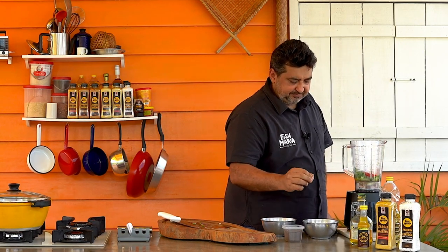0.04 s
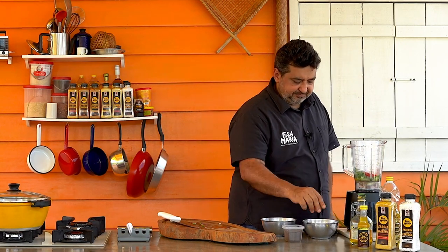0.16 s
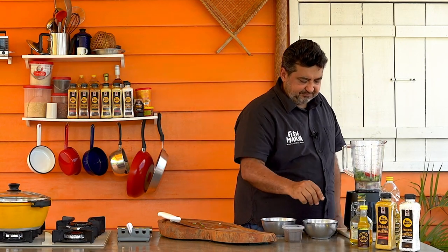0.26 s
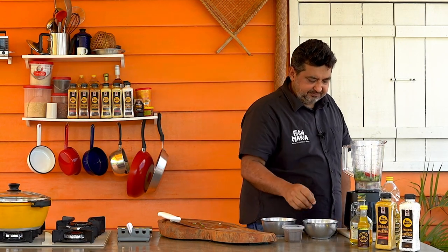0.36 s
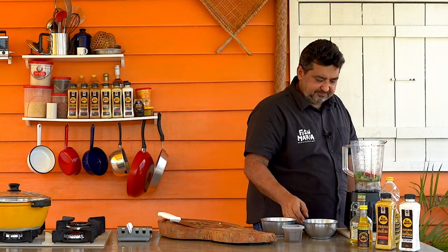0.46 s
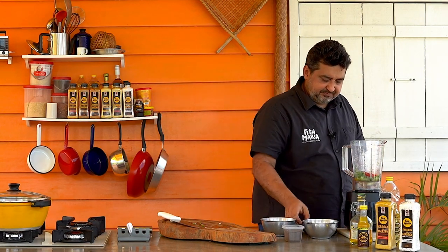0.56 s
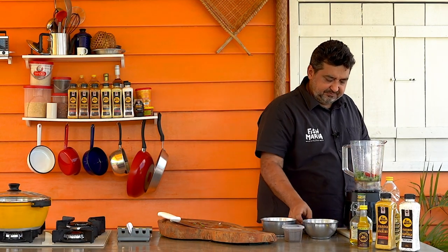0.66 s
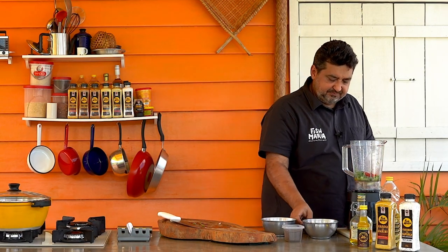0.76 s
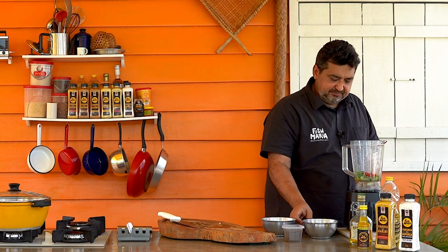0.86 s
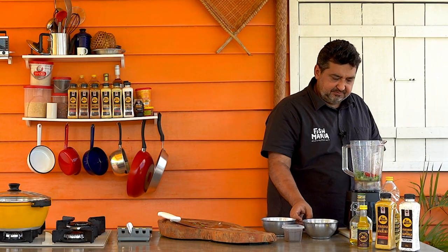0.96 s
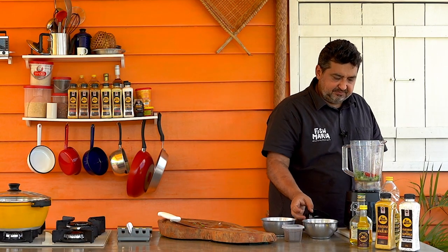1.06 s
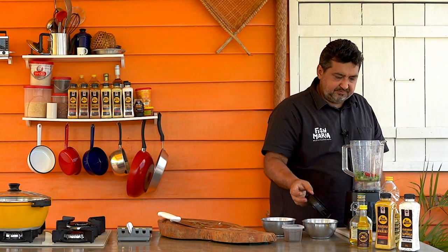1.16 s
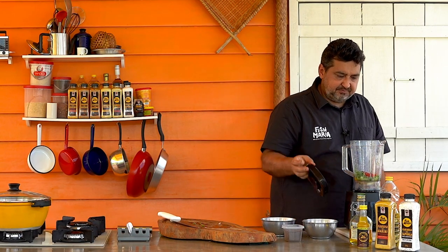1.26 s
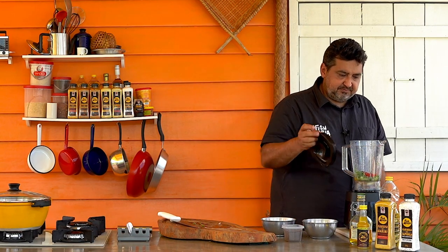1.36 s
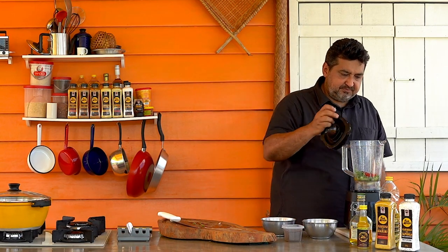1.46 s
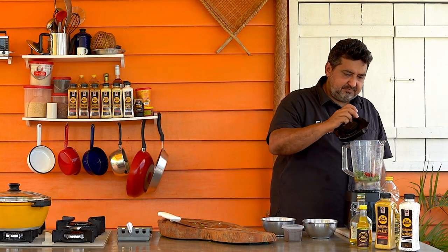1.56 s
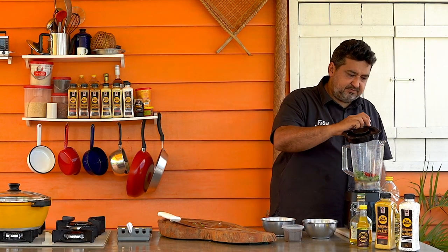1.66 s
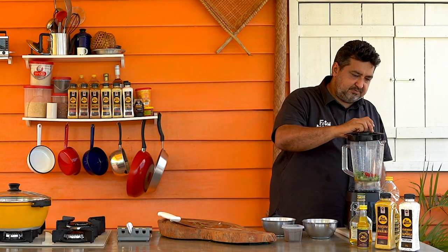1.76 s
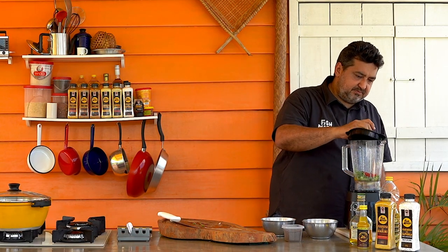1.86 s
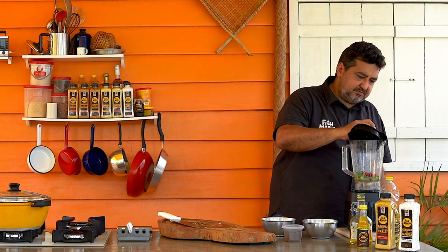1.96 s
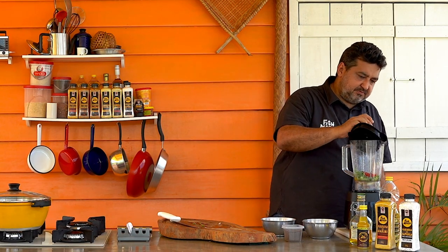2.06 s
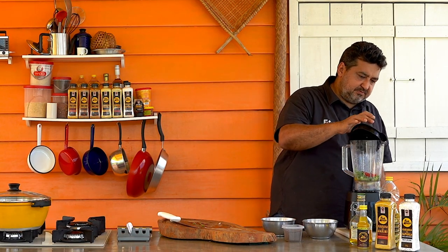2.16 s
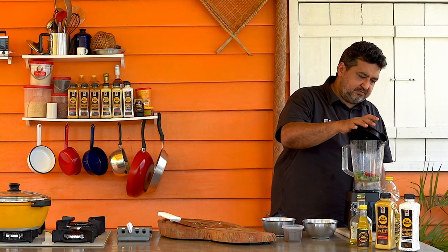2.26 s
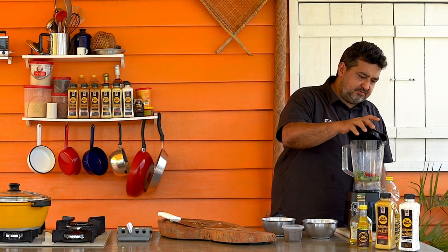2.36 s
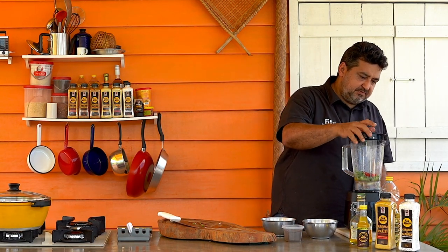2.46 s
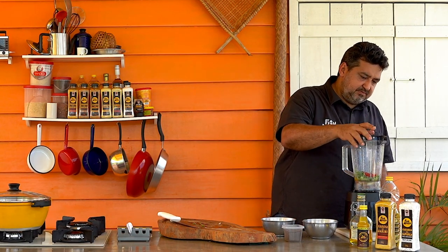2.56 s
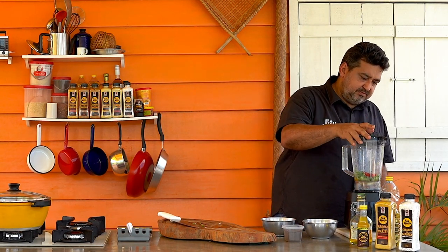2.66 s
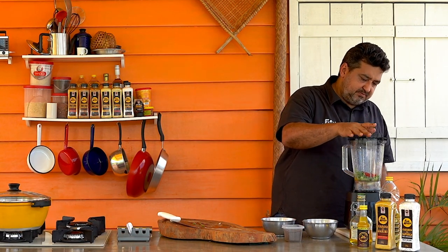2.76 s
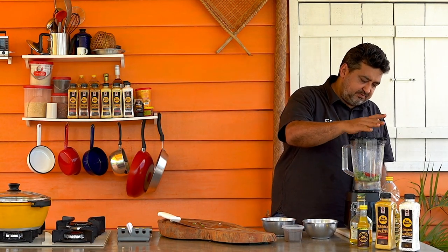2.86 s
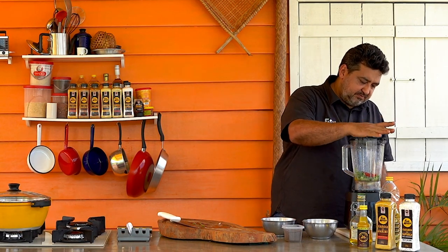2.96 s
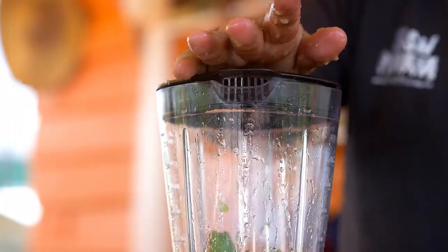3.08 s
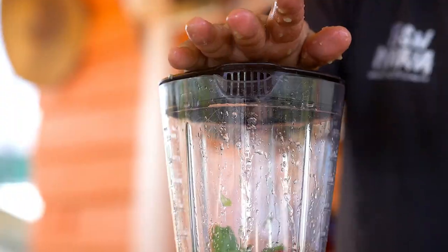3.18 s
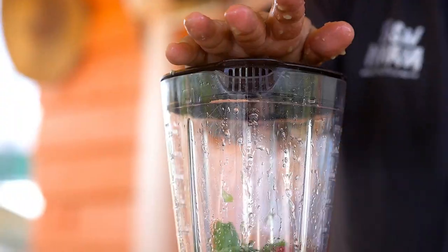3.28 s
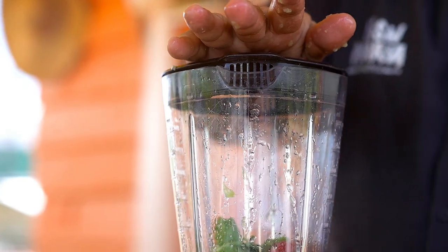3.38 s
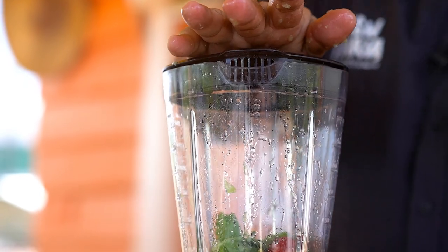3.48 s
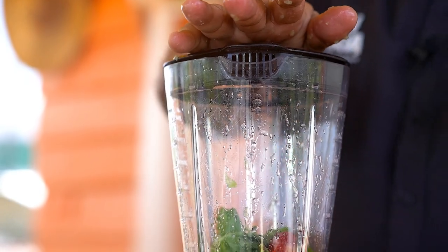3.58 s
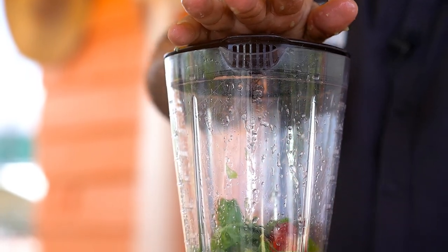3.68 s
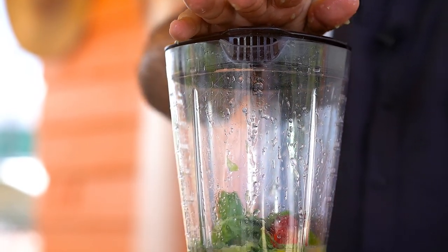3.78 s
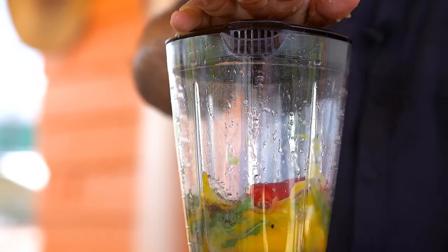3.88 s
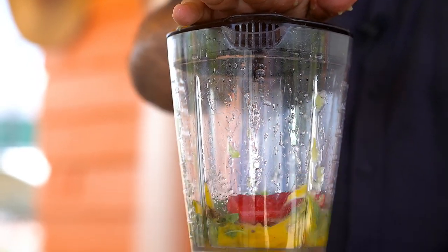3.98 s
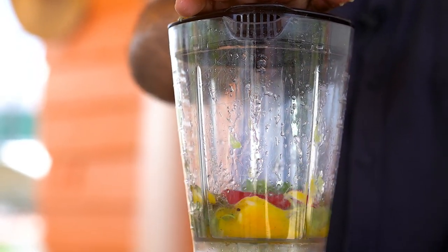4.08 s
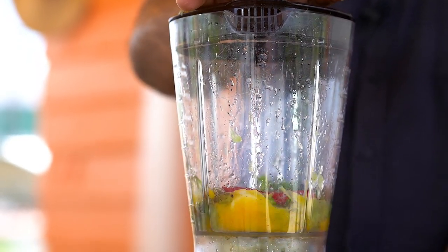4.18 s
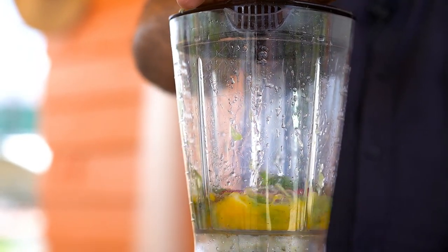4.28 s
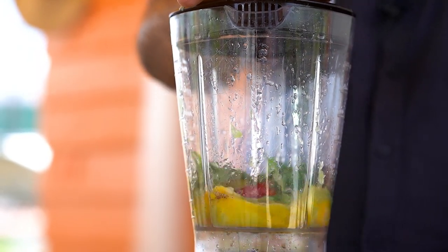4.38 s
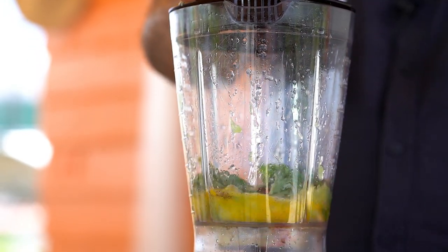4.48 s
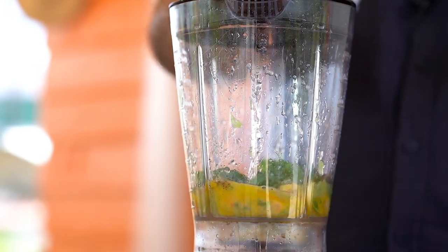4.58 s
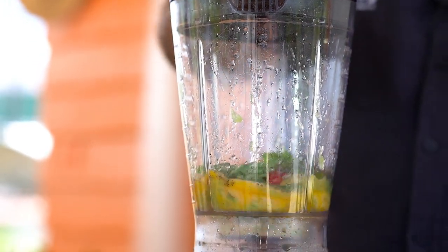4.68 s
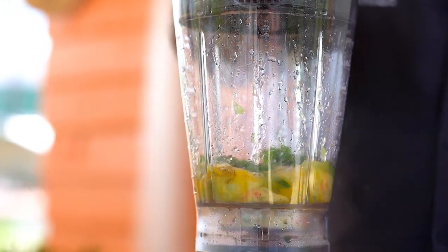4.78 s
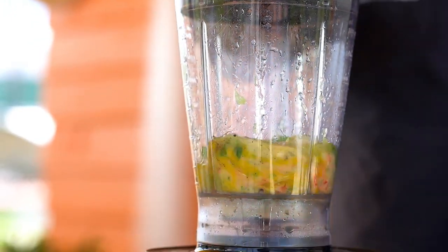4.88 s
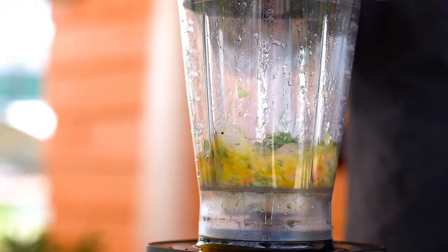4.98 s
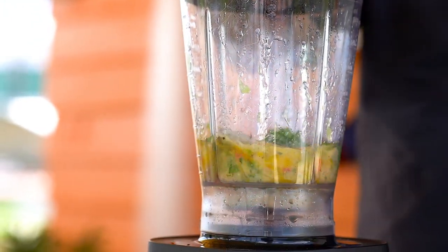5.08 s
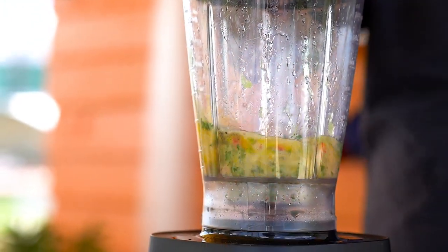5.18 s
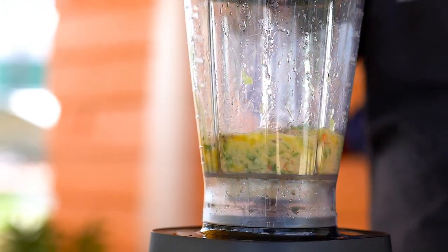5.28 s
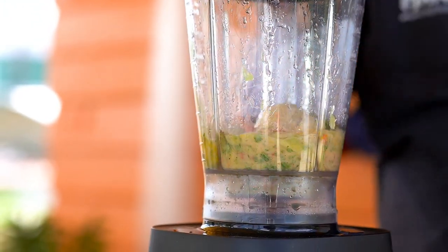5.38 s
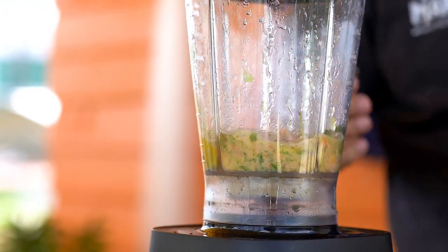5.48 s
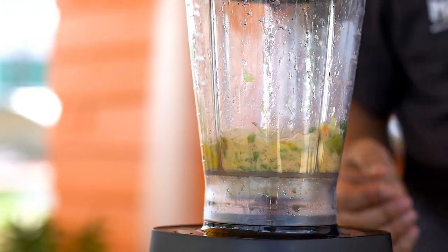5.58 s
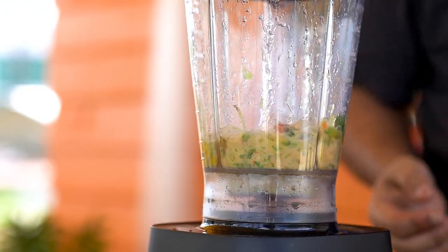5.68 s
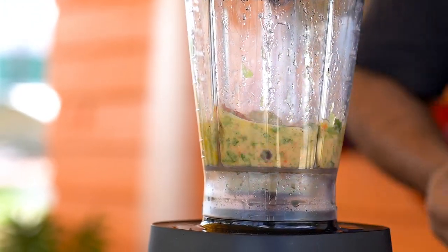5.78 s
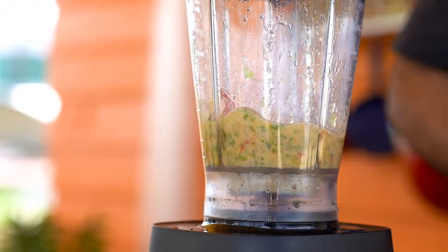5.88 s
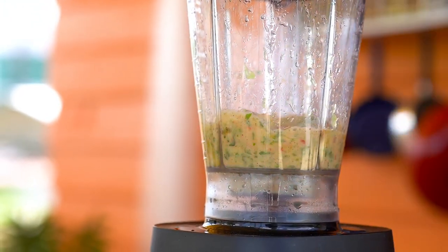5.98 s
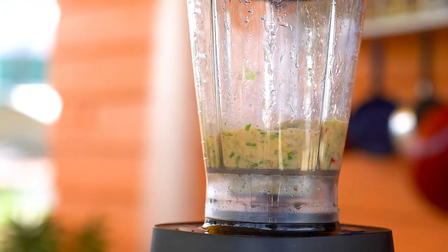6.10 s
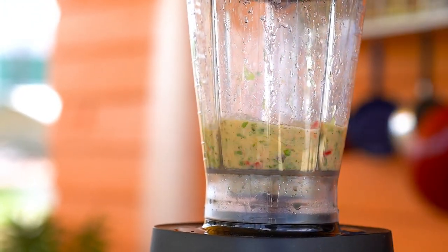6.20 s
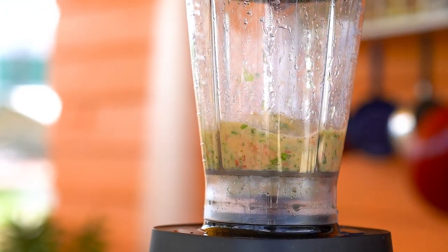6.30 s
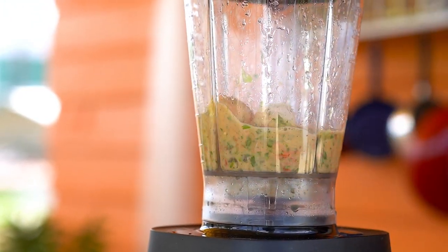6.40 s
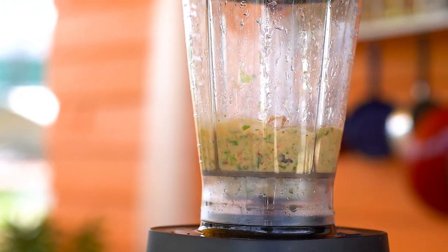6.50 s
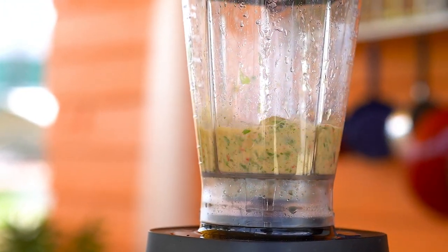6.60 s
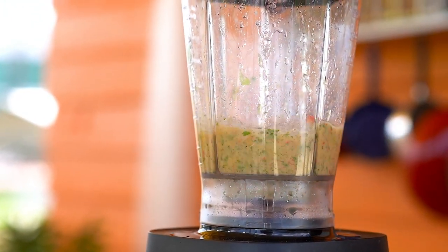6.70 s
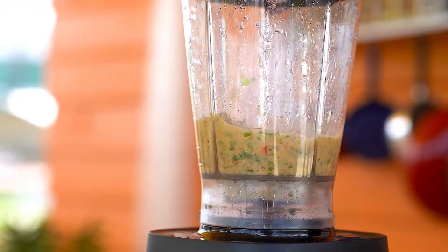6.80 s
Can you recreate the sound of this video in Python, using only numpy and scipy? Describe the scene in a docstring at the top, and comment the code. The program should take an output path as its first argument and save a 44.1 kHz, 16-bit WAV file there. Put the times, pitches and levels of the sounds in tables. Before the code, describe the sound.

In an open-air kitchen, a blender lid is picked up and knocked into place, then the blender kicks on loudly and chops wet food.

```python
"""Outdoor air, a far machine's hum and whine and a faint ticking rustle lie under an open-air kitchen.
A plastic lid is picked up among steel bowls, knocked onto a blender jar and pressed home: struck modes,
noise bursts and rubbing, answered by nearby walls, with narrow swishes and a thin passing drone.
Then the motor kicks the jar and spins up: multiples of the shaft speed whine, a wandering sine howls
at the jar's strongest resonance, and shaped noise makes the chopped food, flung pieces and fan."""
import sys
import numpy as np
from scipy import signal
from scipy.fft import rfft, irfft, next_fast_len
from scipy.io import wavfile
from scipy.ndimage import uniform_filter1d, map_coordinates

SR = 44100
rng = np.random.default_rng(int(sys.argv[2]) if len(sys.argv) > 2 else 0)


def bounce(signal):
    """Save signal as a 16-bit WAV file at the path given by the first command-line argument."""
    frames = np.transpose(np.atleast_2d(signal))
    limited = np.clip(frames, -1, 1)
    pcm = np.round(limited * 32767).astype(np.int16)
    wavfile.write(sys.argv[1], SR, pcm)


N = 301864  # length of the scene in samples
T = np.arange(SR // 3) / SR  # time within one struck sound, s


def amp(db):
    """Gain of a level in dB."""
    return 10 ** (np.asarray(db) / 20)


def unit(x):
    """x at rms 1."""
    return x / np.sqrt(np.mean(x ** 2) + 1e-20)


def along(points, hz):
    """Values between (Hz, value) points on a log frequency axis."""
    f, values = np.transpose(points)
    return np.interp(np.log(hz + 1), np.log(f + 1), values)


def curves(rows):
    """One value per sample for each column, then a gate that is open inside the table's span."""
    s, *cols = np.transpose(rows)
    t = np.arange(N) / SR
    gate = np.clip(np.minimum(t - s[0], s[-1] + 0.0096 - t) / 0.0037, 0, 1)
    return [np.interp(t, s, c) for c in cols] + [gate]


def spell(start, length, edge=0.024):
    """A gain that fades in, holds and fades out; start, length and edge in seconds."""
    t = np.arange(N) / SR - start
    return np.clip(np.minimum(t, length - t) / edge, 0, 1) ** 2


def wobble(rate):
    """A smooth random curve, rate knots a second."""
    knots = rng.standard_normal(int(N * rate / SR) + 4)
    return map_coordinates(knots, [np.arange(N) * rate / SR])


def filtered(x, response):
    """x shaped by a complex response of frequency."""
    m = next_fast_len(N + SR // 2)
    return irfft(rfft(x, m) * response(np.fft.rfftfreq(m, 1 / SR)), m)[:N]


def coloured(x, points):
    """x shaped by a spectrum of (Hz, dB) points."""
    return filtered(x, lambda f: amp(along(points, f)))


def mode(f, hz, width_hz):
    """Response of one resonance, 1 at its top."""
    return 1j * f * width_hz / (hz * hz - f * f + 1j * f * width_hz + 1e-9)


def patchy(patchy_db, size=(512, 6, 8)):
    """White noise with patches of random gain; size = frame, bins and frames of a patch."""
    z = signal.stft(rng.standard_normal(N + size[0]), nperseg=size[0])[2]
    field = uniform_filter1d(rng.standard_normal(z.shape), size[1], 0)
    field = uniform_filter1d(field, size[2], 1)
    return signal.istft(z * amp(patchy_db * unit(field)), nperseg=size[0])[1][:N]


def tone(hz, jitter_hz, rate):
    """A sine of rms 1 whose pitch wanders."""
    return np.sqrt(2) * np.sin(2 * np.pi * np.cumsum(hz + jitter_hz * wobble(rate)) / SR)


def ring(modes, push=0.00066, hardness_db=0, scatter=0.016, spread_db=5.0):
    """The modes of a struck thing; strengths and pitches shift with the spot that is hit."""
    hz, db, t60 = np.transpose(modes)[:, :, None]
    db = db + rng.normal(0, spread_db, hz.shape)
    db = db + hardness_db * np.log2(hz / 1500)  # a hard contact favours the high modes
    hz = hz * (1 + rng.normal(0, scatter, hz.shape))
    decay = amp(db - 60 * T / t60)
    onset = 1 - np.exp(-T / max(push, .0002))
    return (decay * np.sin(2 * np.pi * hz * T)).sum(0) * onset


def crack(t60, push=0.00028):
    """A decaying burst of noise at the contact; push is its rise time in seconds."""
    return rng.standard_normal(len(T)) * amp(-60 * T / t60) * (1 - np.exp(-T / max(push, .0001)))


def add(track, s, sound):
    """Lay a sound on the track at time s."""
    track[round(s * SR):][:len(sound)] += sound


def outdoor_air():
    """Open-air noise: broad, slightly patchy and drifting in level."""
    # Spectrum of the air. Each row: frequency in Hz, relative density in dB.
    air_colour = [(20, -12), (60, -9), (150, -6), (300, -6), (480, -9), (700, -12), (1500, -20.5),
                  (2300, -25), (5000, -34.5), (10000, -45.5), (15500, -60)]
    # Drift of the air. Each row: time in seconds, level in dB before a slight wobble.
    air_level = [(0.0, -40.5), (1.78, -41.5), (1.94, -35), (2.21, -39.5), (2.62, -44), (2.75, -42.5),
                 (3.8, -41)]
    air_db, _ = curves(air_level)
    return amp(air_db + 0.092 * wobble(9.7)) * unit(coloured(patchy(1), air_colour))


def far_machine():
    """A far machine: noise through narrow resonances hums low and whines high."""
    # Bands of the machine. Each row: centre in Hz, width of the resonance in Hz, level in dB.
    far_bands = [(124.5, 32, -42), (477, 8.7, -52.5), (1571, 28, -51), (1689, 120, -54.5)]
    total = np.zeros(N)
    for hz, width_hz, db in far_bands:
        band = filtered(rng.standard_normal(N), lambda f: mode(f, hz, width_hz) ** 2)
        total += amp(db) * unit(band)
    return total


def rustle():
    """A faint treble rustle near the microphone comes and goes, with tiny ticks in it."""
    # Spectrum of the rustle. Each row: frequency in Hz, relative density in dB.
    rustle_colour = [(5000, -30), (8000, -8), (12000, 6), (14000, -5), (15700, -14)]
    level_db, ticks_per_s, tick_db = -69, 12, 22  # tick gain before colouring
    ticks = (rng.random(N) < ticks_per_s / SR) * rng.standard_normal(N) * amp(tick_db)
    ticks = signal.fftconvolve(ticks, crack(.003)[:400])[:N]
    hiss = coloured(patchy(2.2), rustle_colour)
    swelling_hiss = amp(1.33 * wobble(5)) * hiss
    return amp(level_db) * (swelling_hiss + coloured(ticks, rustle_colour)) / np.std(hiss)


def jar_knocks(rings, clatter, cracks):
    """Knocks on the jar: its air sounds one low note, its wall rings and the contact bursts into noise."""
    # Three tables of blows: lid against the jar's rim, hand on the closed lid, starting motor's kicks.
    # Each row: start in seconds, strength in dB, air note in Hz, clatter in dB over the strength,
    # crack in dB over the strength, rise of the push in seconds.
    rim_knocks, lid_pats, motor_jolts = [(0.202, -22.5, 300, -12, -20, .004),
                                         (1.732, -24, 223, 5.5, -12, 0.0048),
                                         (1.783, -9.5, 452, -16, -31, 0.0076),
                                         (1.849, -7.5, 470, -6, -40, 0.00027),
                                         (1.872, -1.5, 491, -16.5, -38, 0.0048),
                                         (1.899, -10, 485, -30, -34, 0.0045),
                                         (1.957, -2.5, 432, -7, -21, 0.0014),
                                         (1.979, -13.5, 470, -1, -21, 0.0046),
                                         (2.056, -5, 456, -12, -22, 0.00076),
                                         (2.072, -4, 457, -13.5, -35, 0.0061),
                                         (2.258, -16, 455, -15, -32, 0.0024),
                                         (2.455, -14, 417, -20, -30, .012),
                                         (2.474, -4, 425, -13, -21, 0.015),
                                         (2.509, -13.5, 382, -15, -10, 0.0047),
                                         (2.537, -19, 395, -1, -15, 0.003),
                                         (2.549, 1.5, 355, -15, -19, .0015),
                                         (2.573, -9.5, 462, -4, -16, 0.0025),
                                         (2.588, -24, 417, -7, 4, .006),
                                         (2.618, -4, 300, -6.5, -30, 0.0024),
                                         (2.753, -20, 270, -19, -24, .0027)], [(2.97, -20, 132, -24, -28, 0.0071),
                                                         (3.044, -16, 200, -10, -18, 0.0059),
                                                         (3.052, -7, 207, -4.5, -13.5, 0.00053),
                                                         (3.274, -23, 335, -9, -32, 0.0027),
                                                         (3.585, -34.5, 124, 3.5, -6, .006)], [(3.881, -10, 253, -3.5, -10, 0.002),
                                                                       (3.901, -8, 525, -5, -21, 0.0015),
                                                                       (3.956, -2, 262, -15, -30, 0.022)]
    # Modes of the jar wall. Each row: frequency in Hz, relative level in dB, decay by 60 dB in seconds.
    wall_modes = [(750, -2, 0.038), (990, -10, 0.022), (1245, 1.5, 0.033), (1464, 0, 0.032),
                  (1710, 1.5, 0.04), (2400, -0.5, 0.018), (2500, -13, 0.027)]
    # Each row: blows, counter thud in dB, wall ring in dB, decay of the jar's air in seconds.
    for rows, thud_db, wall_db, t60 in [
            (rim_knocks, -18, -9, .062), (lid_pats, -5, -10, .06), (motor_jolts, -18, -6, .14)]:
        for s, db, hz, clatter_db, crack_db, push in rows:
            air_modes = [(hz, 0, t60), (150, thud_db, .05), (620, -14, .025)]
            air = amp(db) * ring(air_modes, push, scatter=0.0095, spread_db=0.5)
            wall = amp(db + clatter_db + wall_db) * ring(wall_modes, push / 2, scatter=0.019)
            add(rings, s, air + wall)
            add(clatter, s, amp(db + clatter_db) * crack(0.046, push / 2))
            add(cracks, s, amp(db + crack_db) * crack(0.017, push / 3))


def lid_taps(rings, clatter, cracks):
    """The lid taps the counter: short plastic modes, with more crack the harder the contact."""
    # Taps. Each row: start in seconds, strength in dB, hardness in dB per octave.
    counter_taps = [(.782, -18.5, -9), (.795, -20, -8), (.872, -28, -14), (.884, -25, -8),
                    (.892, -18.5, -7), (0.912, -21.5, -3), (.977, -21, -8), (0.986, -10.5, 5),
                    (0.998, -20, 6)]
    # Modes of the lid. Each row: frequency in Hz, relative level in dB, decay by 60 dB in seconds.
    lid_modes = [(326, -13.5, 0.082), (1000, -4, 0.03), (1352, 13.5, 0.022), (1514, 3.5, 0.045),
                 (2150, 9.5, 0.016), (2720, -3, 0.022), (3860, -9, 0.026), (6060, -29, .03)]
    crack_db, crack_grows = -15.5, 2.4  # dB over the strength; dB more per dB of hardness
    for s, db, hardness_db in counter_taps:
        struck = ring(lid_modes, hardness_db=hardness_db, push=0.0015, scatter=0.031)
        add(rings, s, amp(db - 13.5) * struck)
        add(clatter, s, amp(db - 9) * crack(0.045, 0.002))
        add(cracks, s, amp(db + crack_db + crack_grows * hardness_db) * crack(0.01))


def bowl_clinks(rings, clatter, cracks):
    """Steel bowls touch: some modes ring far longer than plastic, at nearly fixed pitches."""
    # Contacts. Each row: start in seconds, strength in dB, ring in dB over the strength,
    # crack in dB over the strength, hardness in dB per octave.
    bowl_hits = [(1.15, -19.5, -12, -38, -3.5), (1.202, -9.5, -9.5, -7, -0.5), (1.219, -24, -29, 0, -2),
                 (1.249, -19.5, -13, -1.5, 6)]
    # Modes of the bowl. Each row: frequency in Hz, relative level in dB, decay by 60 dB in seconds.
    bowl_modes = [(794, 5.5, 0.055), (1980, -3, 0.29), (2880, -8.5, 0.045), (3216, -26, 0.31),
                  (4060, -18, 0.091), (4660, -12, 0.053), (6050, -29, 0.22), (7050, -31, .06),
                  (7424, -33, 0.11)]
    for s, db, ring_db, crack_db, hardness_db in bowl_hits:
        struck = ring(bowl_modes, hardness_db=hardness_db, scatter=0.0002, spread_db=3.5)
        add(rings, s, amp(db + ring_db) * struck)
        add(clatter, s, amp(db + 2.5) * crack(0.029))
        add(cracks, s, amp(db + crack_db) * crack(0.029))


def rubbing():
    """Hand and lid slide: gritty noise with a fast random flutter."""
    # Slides. Each row: start in seconds, length in seconds, level in dB.
    slides = [(.76, 0.26, -50), (.95, 0.056, -48), (1.0, .13, -50), (1.187, 0.22, -46.5),
              (1.715, 0.081, -41.5), (1.96, 0.17, -47), (2.468, 0.14, -39), (2.58, 0.18, -48)]
    # Spectrum of the rub. Each row: frequency in Hz, relative density in dB.
    rub_colour = [(300, -18), (1400, 11), (2900, -6), (4000, -2), (4900, -8), (5900, -14), (7300, -22),
                  (8200, -31), (12000, -15), (15500, -26)]
    grit = unit(coloured(patchy(2.9) * amp(4.1 * wobble(78)), rub_colour))
    return sum(amp(db) * spell(s, length) for s, length, db in slides) * grit


def handling():
    """Every contact shares three tracks: rings, broad clatter and bright cracks; rubbing joins them."""
    rings, clatter, cracks = np.zeros((3, N + SR))
    jar_knocks(rings, clatter, cracks)
    lid_taps(rings, clatter, cracks)
    bowl_clinks(rings, clatter, cracks)
    # dense plastic modes blur into a broad band
    clatter = amp(7) * filtered(clatter[:N], lambda f: mode(f, 740, 1110) / (1 + 1j * f / 3500))
    cracks = amp(4.5) * filtered(cracks[:N], lambda f: mode(f, 3000, 4600) ** 2)
    # small things radiate no deep bass
    contacts = filtered(rings[:N] + clatter + cracks, lambda f: (1j * f / (70 + 1j * f)) ** 2)
    return contacts + rubbing()


def porch(x):
    """Nearby walls answer after 500 samples with a short noise tail, longest in the middle range."""
    hz, t, z = signal.stft(rng.standard_normal(SR // 2), SR, nperseg=256)
    t60 = along([(200, 0.1), (2000, 0.16), (10000, 0.14)], hz)[:, None]  # seconds at each Hz
    tail = signal.istft(z * amp(-60 * t / t60), SR, nperseg=256)[1]
    return signal.fftconvolve(np.pad(x, (500, 0)), tail / np.linalg.norm(tail))[:N]


def slow_noise():
    """Noise below about 250 Hz at rms 1."""
    return unit(filtered(rng.standard_normal(N), lambda f: 1 / (1 + (f / 250) ** 2)))


def swishes():
    """Things slide, and air hisses out as the lid seats: noise squeezed into a narrow band that follows a
    moving pitch."""
    # Each row: start in seconds, length in seconds, first pitch in Hz, last pitch in Hz, level in dB.
    swish_rows = [(.81, .17, 4720, 5140, -55), (.82, 0.17, 7200, 7400, -64), (2.627, .13, 5300, 4500, -53),
                  (3.714, .08, 2690, 2730, -61)]
    total = np.zeros(N)
    for s, length, first_hz, last_hz, db in swish_rows:
        pitch = np.interp(np.arange(N) / SR, [s, s + length], [first_hz, last_hz])
        phase = 2 * np.pi * np.cumsum(pitch) / SR
        band = slow_noise() * np.sin(phase) + slow_noise() * np.cos(phase)
        total += amp(db) * spell(s, length, edge=.02) * band
    return total


def thin_drone():
    """A thin passing drone: one sine with a slightly wandering pitch."""
    # Each row: time in seconds, level in dB.
    drone_level = [(.85, -51), (1.25, -48), (1.8, -45.5)]
    db, gate = curves(drone_level)
    return gate * amp(db) * tone(219, 0.65, 5.8)  # 219 Hz


def churn(turn):
    """Food beaten by the blades in the resonant jar, and the motor fan's airy noise."""
    # Each row: time in seconds, chopping level in dB, fan level in dB before its wobble.
    churn_level = [(3.86, -60, -62), (3.88, -26.5, -41), (3.91, -14, -27.5), (3.95, -13.5, -32),
                   (4.0, -17.5, -25), (4.3, -14.5, -27), (4.5, -14.5, -27), (4.76, -14, -25),
                   (5.05, -14.5, -27), (5.2, -15.5, -23), (5.42, -15, -25), (5.8, -14, -24.5),
                   (6.25, -16.5, -25.5), (6.37, -16.5, -28.5), (6.59, -18, -25.5), (6.84, -18.5, -29)]
    # Spectra of food and fan. Each row: frequency in Hz, relative density in dB.
    food_colour, fan_colour = [(25, -31), (80, -13.5), (190, -10.5), (300, -1.5), (420, -1.5), (600, -6),
                               (1030, -6), (1500, -7), (2540, -8.5), (3800, -19), (5000, -17.5),
                               (9000, -32.5)], [(2060, 7), (3500, 6), (3820, 1), (4910, 6), (7550, -4.5),
                                             (12300, -1), (13900, -3.5), (15600, -23)]
    # Jar resonances. Each row: centre in Hz, width in Hz, gain in dB over the food's spectrum.
    jar_modes = [(261, 20, 9), (488, 34, 7.5), (777, 28, 4), (1035, 150, 1), (1240, 210, -3),
                 (2330, 21, -20), (2640, 27, -43), (4750, 400, -43)]
    chop_db, fan_db, on = curves(churn_level)
    blades = 1 + 0.13 * np.sin(turn)  # the food is struck once a turn
    unevenness = amp(0.26 * wobble(30) + 0.22 * wobble(150) + 0.3 * wobble(16))
    lumps = patchy(1.8) * blades * unevenness
    # the swirling mix sings in short narrow streaks
    lumps = lumps + amp(-3) * patchy(3.46, size=(1024, 2, 9))

    def jar(f):
        resonances = sum(amp(db) * mode(f, hz, width_hz) for hz, width_hz, db in jar_modes)
        return amp(along(food_colour, f)) * (1 + resonances)

    food = amp(chop_db) * unit(filtered(lumps, jar))
    fan_gain = amp(fan_db + 0.34 * wobble(25) + 1.4 * wobble(11))
    fan = fan_gain * unit(coloured(patchy(1) * blades, fan_colour))
    return on * (food + fan)


def howl():
    """The strongest jar resonance howls: a sine unsteady in pitch and strength."""
    # Each row: time in seconds, level in dB before the wobble.
    howl_level = [(3.89, -42), (3.91, -11), (3.94, -8), (3.955, -27.5), (4.0, -20), (4.13, -7), (4.25, -21),
                  (4.28, -11), (4.51, -13), (4.8, -15.5), (4.85, -30), (4.89, -15.5), (5.09, -11.5),
                  (5.14, -28), (5.32, -10.5), (5.47, -16.5), (5.67, -7.5), (5.84, -17.5), (6.16, -11.5),
                  (6.3, -14.5), (6.35, -9), (6.52, -19), (6.72, -8.5), (6.84, -8.5)]
    howl_db, on = curves(howl_level)
    centre_hz = 515.7 + 4 * wobble(6)
    return on * amp(howl_db) * (1 + .45 * wobble(24)) * tone(centre_hz, 5.8, 45)


def flung_chunks():
    """Big pieces caught by the blades and flung at the wall: bursts of rattling band noise."""
    # Bursts. Each row: start in seconds, length in seconds, level in dB.
    chunk_bursts = [(3.929, 0.035, -17.5), (4.045, 0.098, -13.5), (4.156, 0.086, -16.5),
                    (4.373, 0.074, -13.5), (4.529, .06, -14.5), (4.625, .05, -17), (4.83, 0.058, -15),
                    (4.969, 0.0492, -15.5), (5.102, .05, -24), (5.229, .04, -19), (5.497, 0.047, -21),
                    (6.237, 0.041, -23), (6.322, 0.046, -23)]
    # Rattle bands. Each row: centre in Hz, width of the resonance in Hz, relative level in dB.
    rattle_bands = [(1090, 470, 5.5), (1775, 450, 4), (2120, 890, -2), (3160, 2500, -12)]

    def bands(f):
        return sum(amp(db) * mode(f, hz, width_hz) ** 2 for hz, width_hz, db in rattle_bands)

    rattle = unit(filtered(patchy(2.5) * amp(wobble(120)), bands))
    return sum(amp(db) * spell(s, length, edge=0.012) for s, length, db in chunk_bursts) * rattle


def shaft_tones(turn, shake_db, spinning):
    """The shaft shakes once a turn and whines at whole multiples of its speed."""
    # Multiples that flare up, and those that stay steady, each as a list of whole numbers.
    whine_of, order_of = (4, 6, 10, 19), (2, 5, 7, 8, 18)
    # Usual levels of the flaring and the steady multiples, in dB before a wobble.
    whine_db, order_db = [-43, -41, -37.5, -60], [-24.5, -51, -102, -65, -46]
    # A list of flares for each flaring multiple. Each row: start in seconds, length in seconds,
    # gain in dB added to the usual gain.
    flares = [
        [(4.34, 0.074, -19), (4.5, 0.23, -27), (4.67, 0.18, -20.5), (5.6, 0.24, -26)],
        [(4.5, .5, -34.5), (5.05, .2, -41), (5.6, .3, -28.5), (6.3, 0.11, -27)],
        [(4.5, 0.428, -31.5), (5.05, 0.48, -34), (5.5, 0.792, -37), (6.42, 0.15, -66)],
        [(4.7, .3, -37), (5.75, .3, -39), (6.32, .12, -49)],
    ]
    gains = []
    for usual_db, rows in zip(whine_db, flares):
        flare = sum(amp(db) * spell(s, length, edge=0.037) for s, length, db in rows)
        gains.append(amp(usual_db) + flare)
    gains += list(amp(order_db))
    orders = np.zeros(N)
    for k, gain in zip(list(whine_of) + list(order_of), gains):
        orders += gain * amp(2.5 * wobble(14)) * np.sin(k * turn)
    orders *= spell(4.3, N / SR, edge=0.046)  # the multiples sound from 4.3 s on
    load = 1 + 0.47 * wobble(22)  # the uneven load swells the shake and now and then cancels it
    shake = amp(shake_db) * (load * np.sin(turn) + 0.46 * wobble(22) * np.cos(turn))
    return spinning * np.sqrt(2) * (shake + orders)


def blender():
    """One shaft angle drives the motor tones and the blades; howl and flung pieces join them."""
    # Each row: time in seconds, turns per second before a slight wobble, once-a-turn shake in dB.
    shaft_speed = [(4.0, 132, -30), (4.08, 185, -28.5), (4.17, 226, -20), (4.26, 253, -19), (4.4, 270, -15),
                   (4.6, 262, -18), (5.0, 276, -18), (5.35, 263, -19), (5.6, 279, -20), (5.76, 283, -20),
                   (5.9, 276, -18.5), (6.1, 277, -22.5), (6.3, 266, -19.5), (6.84, 275, -17.5)]
    turns, shake_db, spinning = curves(shaft_speed)
    turn = 2 * np.pi * np.cumsum(turns + 0.814 * wobble(30)) / SR  # shaft angle in radians
    return churn(turn) + howl() + flung_chunks() + shaft_tones(turn, shake_db, spinning)


def scene():
    """All sources in front of one microphone."""
    behind = outdoor_air() + far_machine() + rustle() + thin_drone()
    hands = handling() + swishes()
    return (behind + hands + amp(-7.5) * porch(hands) + blender())[None]


def record(dry):
    """Peaks flatten near full scale; nothing is kept above the band limit."""
    top_hz = 15752
    soft = dry[0] / (1 + np.abs(dry[0]) ** 8) ** (1 / 8)
    return filtered(soft, lambda hz: np.clip((top_hz + 40 - hz) / 120, 0, 1) ** 2)[None]


dry = scene()
out = record(dry)
bounce(out)
```